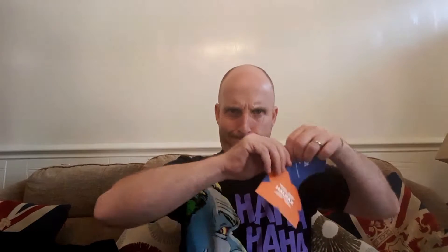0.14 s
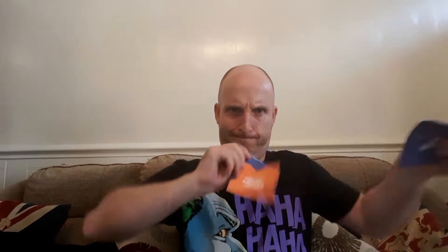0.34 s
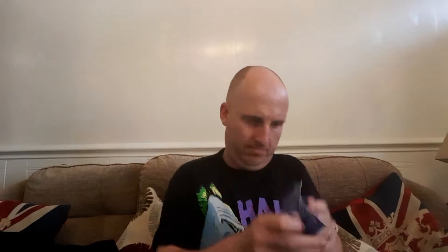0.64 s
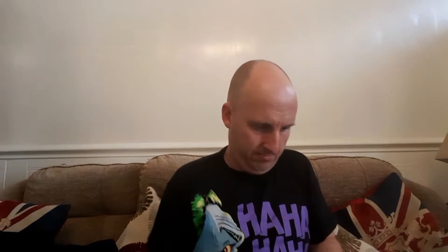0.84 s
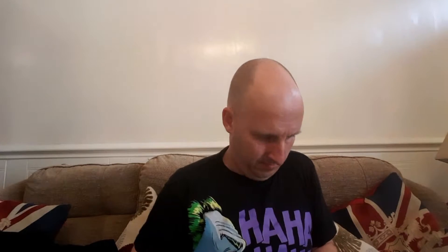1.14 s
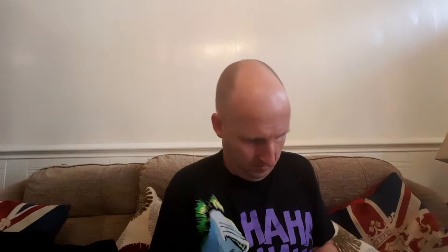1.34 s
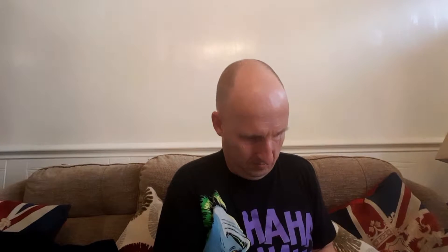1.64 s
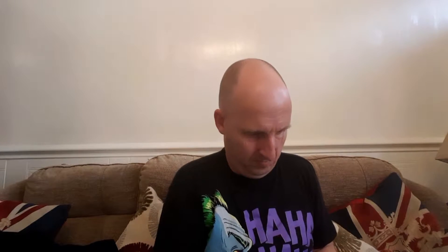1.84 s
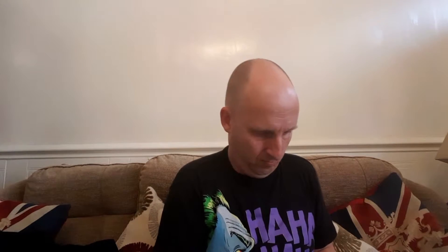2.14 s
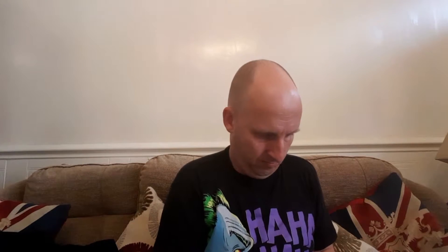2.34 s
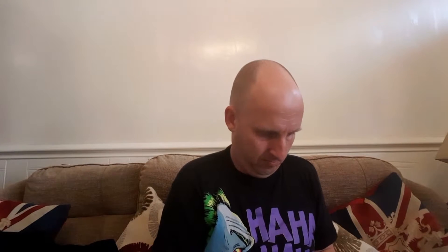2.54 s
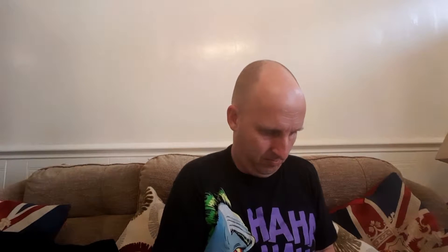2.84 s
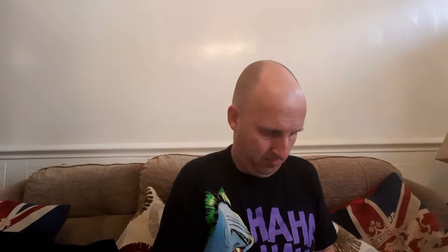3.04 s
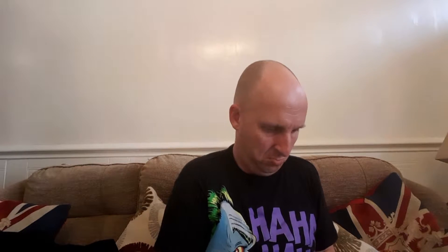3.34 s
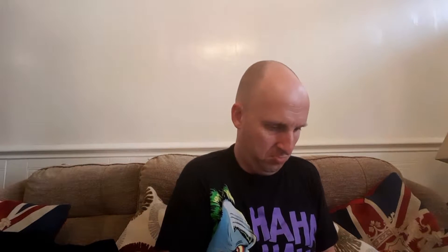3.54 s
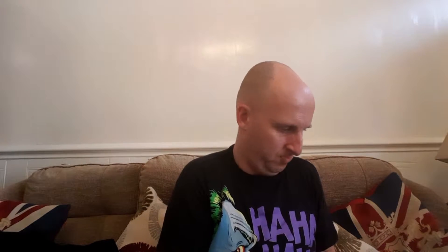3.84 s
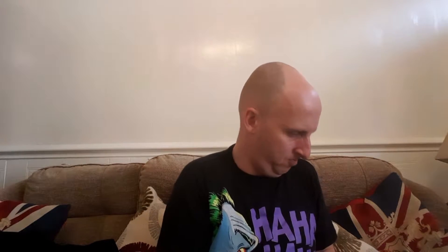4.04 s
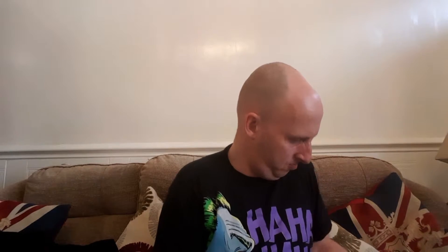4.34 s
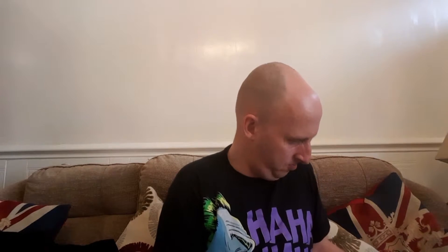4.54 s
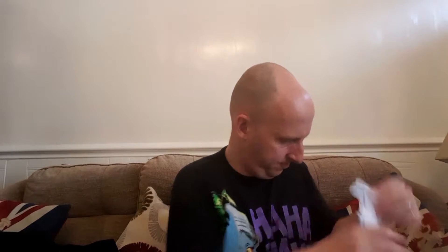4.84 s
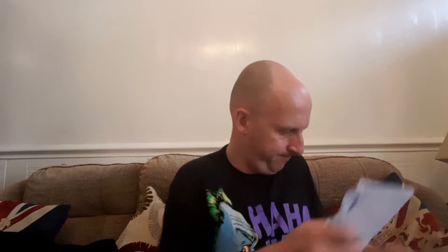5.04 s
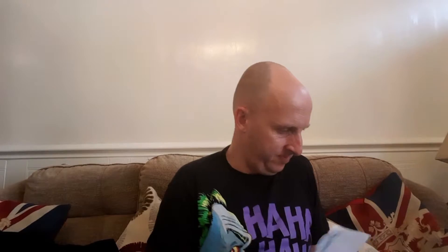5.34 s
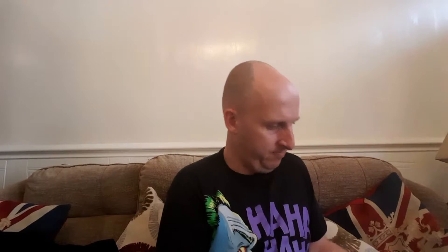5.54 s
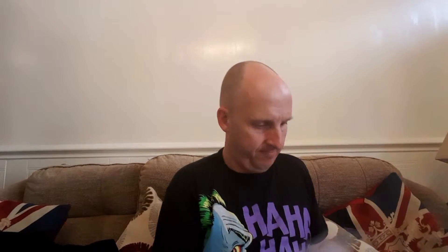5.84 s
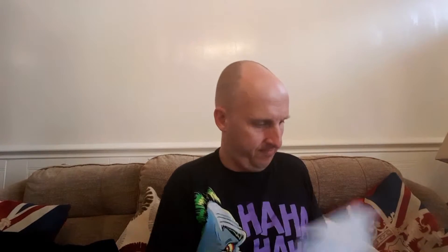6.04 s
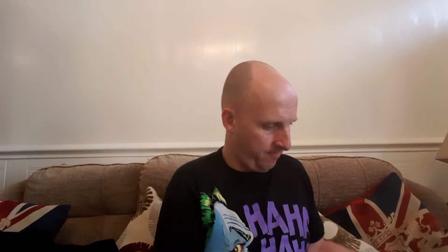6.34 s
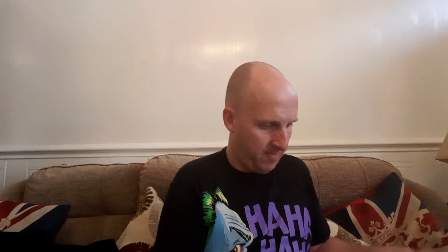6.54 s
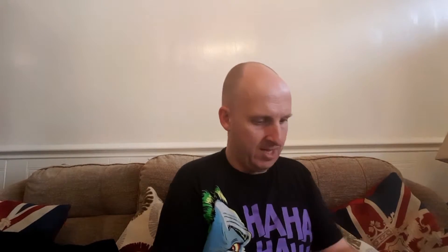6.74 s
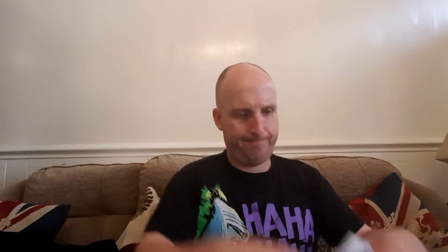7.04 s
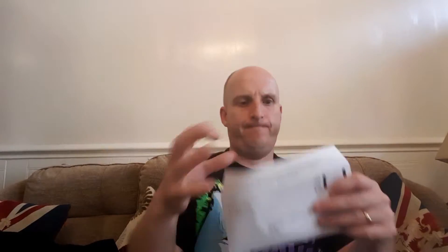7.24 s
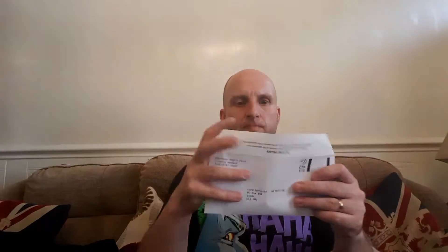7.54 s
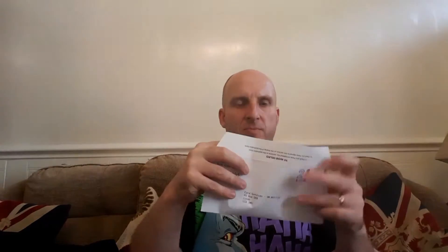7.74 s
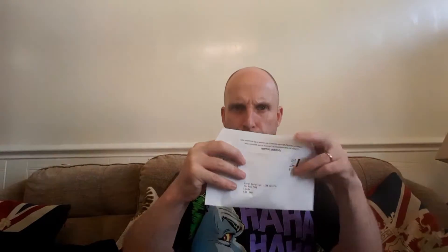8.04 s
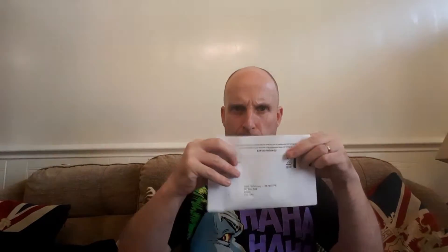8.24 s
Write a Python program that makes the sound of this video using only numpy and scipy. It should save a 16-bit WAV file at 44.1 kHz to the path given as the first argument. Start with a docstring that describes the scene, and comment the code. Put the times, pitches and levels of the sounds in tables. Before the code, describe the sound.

Hands rip and sort through envelopes indoors, the paper sliding, crinkling and snapping in fits and starts.

```python
"""Paper mail is shuffled, torn and crumpled by hand, a step away in a furnished living room.
Sheets slide over each other in fits and starts, fibres rip in short pulls and creases snap.
Each rip or snap rings the sheet, with a low thump and a crack in the treble.
The room answers briefly, over a faint hiss and a low rumble."""
import sys
import numpy as np
from scipy import signal
from scipy.fft import rfft, irfft, next_fast_len
from scipy.io import wavfile
from scipy.ndimage import map_coordinates

SR = 44100
rng = np.random.default_rng(int(sys.argv[2]) if len(sys.argv) > 2 else 0)


def int16_out(signal):
    """Quantize to a 16-bit WAV file."""
    q = np.round(np.clip(np.atleast_2d(signal).T, -1, 1) * 32767)
    wavfile.write(sys.argv[1], SR, q.astype(np.int16))


N = 370087
LEAD_S = .004  # each rip or snap starts this long before its cue


def amp(db):
    """Decibels to gain."""
    return 10 ** (np.asarray(db) / 20)


def unit(x):
    """Scale each row to rms 1."""
    return x / np.sqrt(np.mean(x ** 2, axis=-1, keepdims=True) + 1e-20)


def along(points, hz):
    """Read (f/Hz, value) breakpoints on a log frequency axis."""
    f, value = np.transpose(points)
    return np.interp(np.log(hz + 1), np.log(f + 1), value)


def wobble(rate):
    """A smooth random modulator with rate knots a second."""
    knots = rng.standard_normal(int(N * rate / SR) + 4)
    return map_coordinates(knots, [np.arange(N) * rate / SR])


def filtered(x, response):
    """Filter x with a complex frequency response."""
    size = next_fast_len(x.shape[-1] + 4096)
    return irfft(rfft(x, size) * response(np.fft.rfftfreq(size, 1 / SR)), size)[..., :x.shape[-1]]


def coloured(x, eq):
    """x through an EQ curve, at rms 1."""
    return unit(filtered(x, lambda hz: amp(along(eq, hz))))


def resonance(f, centre_hz, q):
    """Response of a resonant band-pass at the frequencies f."""
    damping = 1j * f * centre_hz / q
    return damping / (centre_hz ** 2 - f * f + damping)


# Hand strokes over the sheets: t/s at full speed, hold/s, slide level/dB, flap/dB re slide,
# surface hiss/dB re slide
HAND_STROKES = [(0.0, 0.017, -41, -11.5, -7), (0.299, .15, -44.5, -8.5, -6.5),
                (0.621, 0.087, -46.5, -3, -8), (.74, 0.093, -44, -8.5, -0.5), (.95, 0.14, -62, -1, -1),
                (1.08, 0.047, -51.5, -4, 0), (1.255, 0.055, -44.5, -9.5, -6), (1.409, 0.0087, -47, -3, -11),
                (1.49, 0.07, -48.5, -10, 2), (1.679, 0.009, -43, -9.5, -8.5), (1.821, 0.017, -39, -5.5, -9),
                (1.962, 0.025, -41.5, -16, -3.5), (2.0, 0.091, -39, -6, -11),
                (2.27, 0.013, -46.5, -6.5, -5), (2.386, 0.0055, -43, -7, -5), (2.52, .015, -43, -12, -14),
                (2.581, 0.2, -46, -30, -6.5), (2.74, 0.11, -44.5, -5.5, -4), (2.93, 0.036, -55.5, -3, -7.5),
                (3.03, 0.053, -51, -6, -10), (3.118, 0.043, -47.5, -9, -6.5),
                (3.211, .015, -37.5, -12, -7.5), (3.3, 0.44, -47.5, -12.5, -7),
                (3.53, 0.048, -45.5, -0.5, -7), (3.59, 0.013, -43, -6, -8), (3.66, 0.022, -54, 6, -14),
                (3.74, .06, -61.5, -3, 9), (3.888, 0.02, -44.5, -7, -4), (4.03, 0.18, -58, -9, -1.5),
                (4.195, 0.0083, -51.5, -5.5, -11), (4.536, .01, -53.5, -1, 0.5),
                (4.618, .22, -57.5, -5.5, -0.5), (4.9, 0.2, -49.5, -5, -3), (5.189, .17, -52.5, 3, -4.5),
                (5.384, .015, -52, -9, 6.5), (5.512, 0.032, -39, -5.5, -3), (5.7, .1, -63.5, -11, 0),
                (5.83, 0.017, -54.5, -2, -9), (5.91, 0.21, -53.5, -12, -5), (6.17, 0.055, -71.5, 6, -8),
                (6.27, .08, -56, -8, -4.5), (6.38, .04, -82, 3, -17), (6.452, 0.042, -53, 1.5, -2),
                (6.749, .03, -54.5, -3, -6), (6.902, 0.088, -40.5, -6.5, -9), (7.04, 0.077, -56, -13, -5),
                (7.148, 0.0067, -44, 2, -13), (7.43, .02, -59.5, 2, -14), (7.66, 0.021, -42.5, -4.5, -11),
                (7.772, 0.011, -41, -3, -4), (7.943, 0.0054, -46.5, -13, -5.5),
                (8.045, .01, -53.5, -6, -8.5), (8.15, 0.024, -51.5, -8, -4),
                (8.282, 0.043, -43.5, -6.5, -5.5)]
def hand_strokes():
    """Envelopes of slide, flap and hiss: each stroke swells, holds and fades; overlaps add in power."""
    rise_db_per_s, fall_db_per_s = 253, 163.5
    t = np.arange(0, N + 64, 64) / SR
    start, hold, db, flap_db, hiss_db = np.transpose(HAND_STROKES)[:, :, None]
    attack_db = rise_db_per_s * np.maximum(start - t, 0)
    release_db = fall_db_per_s * np.maximum(t - start - hold, 0)
    stroke_db = db - attack_db - release_db
    gains = [np.linalg.norm(amp(stroke_db + trim_db), axis=0) for trim_db in (0, flap_db, hiss_db)]
    return [np.interp(np.arange(N) / SR, t, gain) for gain in gains]


def crinkles(count, centre_hz, log_spread, decay_cycles, spread_db):
    """Small creases give way at random moments, each a short ring with its own pitch and size."""
    when, tone, size = rng.random((count, 3)).T[:, :, None]
    hz = centre_hz * np.exp(log_spread * (2 * tone - 1))
    gain = amp(-spread_db * np.log(1 - .995 * size)) * np.sqrt(hz)  # many small, a few large
    n = np.arange(SR // 100)
    grains = gain * np.sin(2 * np.pi * hz * n / SR) * np.exp(-hz * n / SR / decay_cycles)
    where = (when * N).astype(int) + n
    return unit(np.bincount(where.ravel(), grains.ravel(), N + len(n))[:N])


# EQ of sheets sliding, fibres rubbing and the whole sheet bending: f/Hz, level/dB
SLIDE_EQ = [(400, -16.5), (800, -0.5), (1300, -0.5), (2200, -2), (3200, -2), (5000, -8.5), (7000, -33)]
FIBRE_EQ = [(4000, -21.5), (6000, -7.5), (7700, -15), (9100, -9.5), (10500, -21), (14200, -24),
            (16000, -30.5)]
FLAP_EQ = [(50, -17), (120, 2), (300, 0.5), (600, 7), (1000, -32)]
def sliding_sheets():
    """Sheets rub and flap in fits and starts under the hands, crinkling all the while."""
    slide_gain, flap_gain, hiss_gain = hand_strokes()
    fits_db = 1.8 * wobble(60) + 1.1 * wobble(25)
    friction = rng.standard_normal((3, N))
    fine = crinkles(count=3000, centre_hz=3500, log_spread=1.4, decay_cycles=1.5, spread_db=2.4)
    coarse = crinkles(count=500, centre_hz=399.6, log_spread=.5, decay_cycles=.87, spread_db=2.0)
    slide = coloured(friction[0], SLIDE_EQ) + .6 * coloured(fine, SLIDE_EQ)
    hiss = coloured(friction[1], FIBRE_EQ) + .7 * coloured(fine, FIBRE_EQ)
    flap = coloured(friction[2], FLAP_EQ) + 1.1 * coarse
    hiss_flutter_db = .7 * fits_db + 1.5 * wobble(30)
    flap_flutter_db = 1.2 * fits_db + 3.1 * wobble(25)
    return (slide_gain * unit(amp(fits_db) * slide)
            + hiss_gain * unit(amp(hiss_flutter_db) * hiss)
            + flap_gain * unit(amp(flap_flutter_db) * flap))


# Swells of the low rumble: t/s, level/dB
RUMBLE_SWELLS = [(0.0, -71.5), (0.72, -68), (2.34, -84), (2.83, -70.5), (4.23, -69.5), (4.6, -65.5),
                 (5.35, -64), (5.6, -72.5), (7.45, -72), (7.8, -63), (8.39, -64)]
# EQ of the rumble and of the steady hiss: f/Hz, level/dB
RUMBLE_EQ = [(18, -42.5), (34, -19), (45, 8.5), (70, -4.5), (120, -26.5)]
HISS_EQ = [(60, -25.5), (120, 3), (280, 3), (700, -6), (3300, -34.5), (9000, -17.5), (10700, -38.5),
           (16000, -14)]
def room_tone():
    """A bed of faint steady hiss, with a low rumble that swells now and then."""
    swell_db = np.interp(np.arange(N) / SR, *np.transpose(RUMBLE_SWELLS))
    rumble = amp(swell_db) * coloured(rng.standard_normal(N), RUMBLE_EQ)
    hiss = amp(-65) * coloured(rng.standard_normal(N), HISS_EQ)
    return hiss + rumble


def struck_sheet(cues, push, q, bite):
    """Each push makes the sheet ring, thump and crack; bite ties the crack to the hardest moments."""
    start, db, hz, thump_db, crack_db, thump_hz = np.transpose(cues)[:6, :, None]

    def layer(drive, response):
        """Filter each hit and normalise it to peak 1."""
        hits = filtered(drive, response)
        return hits / np.max(np.abs(hits), axis=1, keepdims=True)

    def body(f):
        """A pitched peak on a broad band; the sheet hardly follows the fastest motion."""
        broad = resonance(f, np.sqrt(hz * 2000), .36) ** 2
        low_pass = 1 / (1 - (f / 5500) ** 2 + 1.2j * f / 5500)
        return (resonance(f, hz, q) + .7) * broad * low_pass

    ring = layer(push, body)
    thump = layer(push, lambda f: resonance(f, thump_hz, 1.6) * resonance(f, .7 * thump_hz, .7))
    spiky_push = push * np.abs(push) ** bite
    crack = layer(spiky_push, lambda f: (resonance(f, 8600, 4) + .31) * resonance(f, 8000, .5) ** 2)
    hits = amp(db) * (ring + amp(thump_db) * thump + amp(crack_db) * crack)
    where = np.round((start - LEAD_S) * SR).astype(int) + np.arange(push.shape[1])
    return np.bincount(where.ravel(), hits.ravel(), N + SR)[:N]


# Short pulls that rip or drag the paper: t/s, ring peak level/dB, ring f/Hz, thump/dB re ring,
# crack/dB re ring, thump f/Hz, length/s
RIP_CUES = [(0.247, -16.5, 2626, -11, -5, 600, 0.023), (.271, -4, 2096, -16, -7.5, 805, 0.028),
            (0.299, -3, 2135, -30.5, -1.5, 574, 0.026), (0.317, -10, 3660, -13.5, -17.5, 594, 0.012),
            (0.761, -37.5, 1510, -16, 6, 400, 0.021), (1.232, -27.5, 1280, -15.5, -20, 453, 0.012),
            (1.814, -29, 2400, -5, -13.5, 310, .025), (2.377, -25.5, 1875, -20, -10.5, 397, 0.013),
            (2.457, -33, 1400, -29, -4.5, 400, 0.043), (2.52, -40.5, 1440, -41, 0, 400, 0.023),
            (3.145, -28, 1500, -35, -7, 400, 0.019), (4.892, -14, 2720, -2, 0.5, 626, 0.0096),
            (4.904, -11.5, 1870, -12.5, -3, 500, 0.024), (4.881, -34.5, 1200, 5, -15, 650, 0.01),
            (4.939, -14, 1293, -7, -6.5, 507, 0.02), (5.393, -28, 2520, -16, -14, 407, 0.02),
            (5.486, -36.5, 1930, -12.5, 5, 405, 0.019), (6.442, -24, 884, -12, -6.5, 296, 0.026),
            (7.585, -33, 1980, -5.5, -14, 353, .045)]
def ripping_fibres():
    """Fibres break densely while the hand pulls, then stop short."""
    t = np.arange(SR // 10) / SR
    length = np.array(RIP_CUES)[:, 6:]
    attack = np.clip(t / .011, 0, 1) ** 1.5
    release = np.clip((LEAD_S + length + .003 - t) / .005, 0, 1)
    noise = rng.standard_normal((len(RIP_CUES), len(t), 2))
    breaks = noise[..., 0] * amp(5 * noise[..., 1])  # 5 dB of scatter adds grit
    return struck_sheet(RIP_CUES, attack * release * breaks, q=4, bite=.15)


# Creases that snap: t/s, ring peak level/dB, ring f/Hz, thump/dB re ring, crack/dB re ring, thump f/Hz
SNAP_CUES = [(0.445, -27.5, 730, -4, -21, 680), (0.543, -55, 956, 18, -26.5, 560),
             (0.606, -38, 1130, -18.5, -25.5, 356), (0.625, -12, 1640, -10.5, -34.5, 457),
             (0.637, -27, 1700, -27, -27.5, 277), (0.74, -21.5, 2120, -39, -28, 318),
             (0.788, -31.5, 2800, -18, -11, 400), (0.7935, -11.5, 1610, -23, -1, 540),
             (0.822, -24, 1470, -23, -22, 318), (1.244, -23, 1200, -28, -22, 471),
             (1.271, -27.5, 851, -13, -20, 657), (1.343, -30.5, 2050, -2.5, -38.5, 670),
             (1.622, -24.5, 3520, -14, -5, 565), (1.662, -23, 902, -13, -25.5, 307),
             (1.67, -28.5, 877, -18, 4.5, 231), (1.825, -22, 1950, -10, 3, 590),
             (1.988, -28, 2070, -7, -18, 350), (2.014, -16.5, 1760, -15, -31.5, 275),
             (2.073, -32.5, 1080, -11, -34, 327), (2.23, -35, 3480, -20, -5, 320),
             (2.26, -31.5, 1730, -38, -16, 681), (2.274, -15.5, 2900, -18.5, -41, 320),
             (2.7, -37.5, 1200, 2.5, -20, 355), (2.836, -32, 1230, -5, -23, 630),
             (2.88, -26, 704, -23, -29, 704), (2.962, -28.5, 2360, -12.5, -34, 622),
             (3.132, -32.5, 2420, -18, -12, 366), (3.248, -27.5, 1230, -3.5, -24, 700),
             (3.425, -28, 1180, -11, -27.5, 686), (3.587, -17.5, 1470, -16, -7, 294),
             (3.653, -28.5, 1260, -7, -33, 331), (3.92, -30, 1450, -4.5, -17, 381),
             (4.196, -26.5, 1740, -2.5, -44.5, 232), (4.449, -50.5, 870, 9.5, -7, 280),
             (4.526, -38.5, 1050, -0.5, -5, 211), (4.65, -43.5, 930, 1, 6, 315),
             (4.704, -43, 948, 4.5, -12, 318), (4.905, -3, 700, -19, -43, 633),
             (4.937, -12.5, 685, 1.5, -13.5, 513), (5.208, -54, 845, 22, -21, 457),
             (5.234, -30, 2650, -12, -4.5, 134), (5.249, -36.5, 1200, -5, 6.5, 574),
             (5.329, -32.5, 860, -7, -15, 193), (5.381, -27, 2900, -15, 0, 192),
             (5.402, -26.5, 2720, -8, 2.5, 523), (5.523, -15, 880, -7, -22.5, 476),
             (5.533, -24, 1880, -17.5, 0, 288), (5.828, -45.5, 1350, 18.5, -27, 219),
             (6.062, -31.5, 1780, -46, -22, 501), (6.26, -38.5, 1900, -6, -6, 487),
             (6.434, -29, 907, -6, -24.5, 480), (6.765, -33.5, 1180, -4, -35, 657),
             (6.852, -30, 754, -10, -2.5, 583), (6.885, -32, 3000, -11, 1.5, 311),
             (6.912, -14, 2450, -18, -47, 155), (6.948, -12, 1840, -36, -38, 265),
             (6.995, -27.5, 2380, -11, -25, 420), (7.143, -22.5, 1380, -36, -32, 490),
             (7.18, -32, 1550, -13.5, -20, 190), (7.28, -45, 1800, -1.5, -18, 200),
             (7.313, -45, 950, -8, -25, 300), (7.405, -48, 804, 14.5, -3, 500),
             (7.44, -27, 2670, -16.5, -32.5, 131), (7.586, -28.5, 2480, -8.5, -45.5, 266),
             (7.604, -31.5, 2790, -6.5, -2, 318), (7.632, -11, 2500, -15, -8, 293),
             (7.658, -23, 1290, -14, -18, 503), (7.688, -28, 1190, -20, -30.5, 406),
             (7.734, -29, 727, -17, -25.5, 684), (7.757, -19.5, 2500, -8.5, -19.5, 705),
             (7.764, -8, 1720, -11, -23, 860), (7.789, -20, 2600, -6.5, -28, 420),
             (7.902, -33.5, 2030, -27, -21.5, 490), (7.939, -28.5, 1190, -3.5, -10, 510),
             (8.049, -30, 2220, -22, -6.5, 453), (8.1, -29.5, 1750, -5.5, -18.5, 500),
             (8.25, -30.5, 1080, -4, -17.5, 610), (8.288, -26.5, 703, -5.5, -18, 670),
             (8.323, -19.5, 1490, 3.5, -29.5, 520), (8.347, -21.5, 1050, -35, -16, 431)]
def snapping_creases():
    """A crease snaps with a brief rising onset and chatters."""
    t = np.arange(SR // 10) / SR - LEAD_S
    chatter_t60_s = .024 * np.exp(.27 * rng.standard_normal((len(SNAP_CUES), 1)))
    onset = amp(-22 + 3000 * t)
    chatter = amp(-60 * t / chatter_t60_s) * (1 - .5 * np.exp(-np.abs(t) / .0005))
    envelope = np.where(t < 0, onset, chatter)
    push = envelope * rng.standard_normal(envelope.shape)
    push[:, round(LEAD_S * SR) + SR // 2000] += 3.5  # the click as the crease flips
    return struck_sheet(SNAP_CUES, push, q=3, bite=.6)


# Reverb decay of the furnished room: f/Hz, t60/s
ROOM_DECAY = [(200, 0.26), (1400, 0.32), (3700, 0.36), (10000, 0.29)]
def room_reverb(send):
    """Each frequency dies at its own speed; the hands move, so every 1/8 s gets a fresh tail."""
    wet = np.zeros(N + SR)
    block, predelay = SR // 8, SR // 300
    for start in range(0, N, block):
        hz, t, noise = signal.stft(rng.standard_normal(SR // 2), SR, nperseg=256)
        decay = amp(-60 * t / along(ROOM_DECAY, hz)[:, None])
        tail = signal.istft(noise * decay, SR, nperseg=256)[1]
        answer = signal.fftconvolve(send[start:start + block], tail / np.linalg.norm(tail))
        wet[start + predelay:][:len(answer)] += answer
    return wet[:N]


def scene():
    """Close paper, its short reverb and the room tone, mixed in mono."""
    snaps, rips, slides = snapping_creases(), ripping_fibres(), sliding_sheets()
    reverb = room_reverb(amp(-9.5) * snaps + amp(-7.5) * rips + amp(-15) * slides)
    return (snaps + rips + slides + reverb + room_tone())[None]


def record(dry):
    """Round off the loudest peaks, then cut the deepest bass and the highest treble."""
    ceiling, low_cut_hz, high_cut_hz = .8, 33, 15700
    rounded = dry / (1 + np.abs(dry / ceiling) ** 4) ** .25
    return filtered(rounded, lambda hz: (hz < high_cut_hz) / (1 + (low_cut_hz / (hz + 1)) ** 6))


dry = scene()
out = record(dry)
int16_out(out)
```